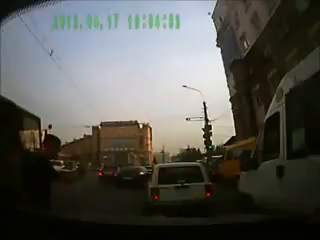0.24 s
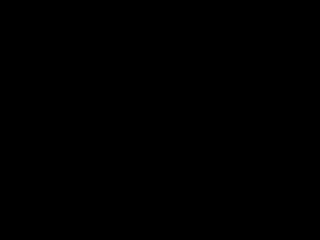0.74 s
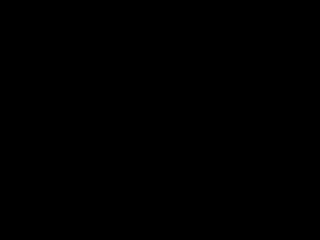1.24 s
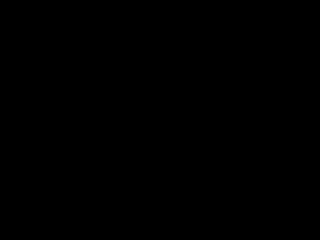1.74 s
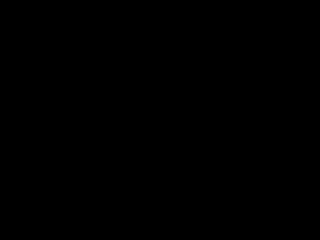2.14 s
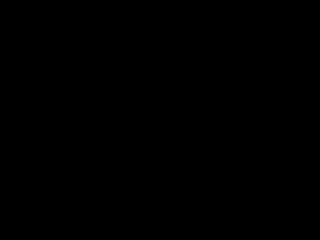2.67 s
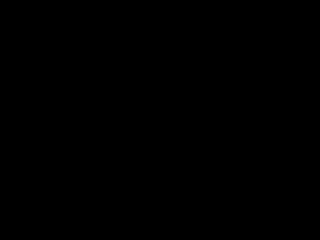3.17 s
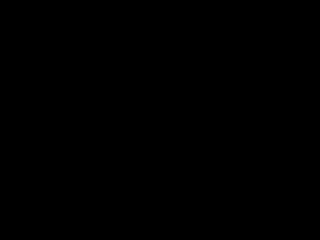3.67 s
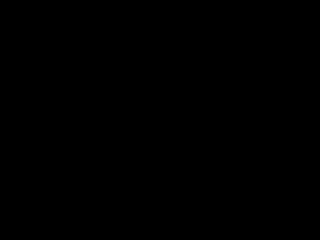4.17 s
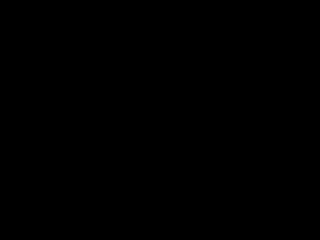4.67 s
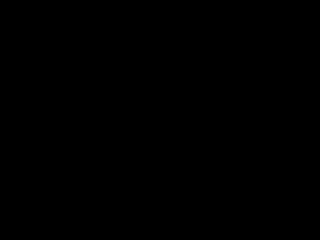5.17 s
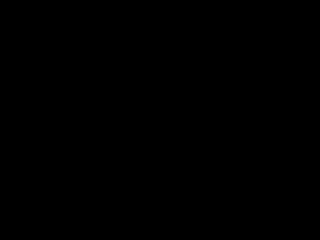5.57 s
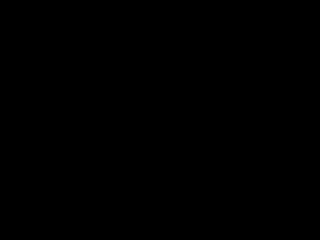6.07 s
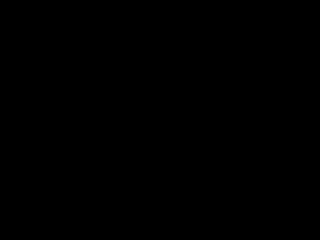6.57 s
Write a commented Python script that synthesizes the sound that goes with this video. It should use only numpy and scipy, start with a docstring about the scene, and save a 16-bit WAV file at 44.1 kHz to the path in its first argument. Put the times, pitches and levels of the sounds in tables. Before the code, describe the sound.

A low engine throb and passing traffic, heard from a car cabin, before a tyre skid ends in a collision and another bump.

```python
"""An idling engine throbs through a car's booming cabin, heard by a cheap dashboard microphone. First comes
a moment of quiet city street with the signal off centre, ending in a click. Then, over the idle, traffic
swells past, tyres outside stick and slip into a screech, and a blow and a second bump ring the car body.
Something groans and far brakes squeal faintly."""
import sys
import numpy as np
from scipy import signal
from scipy.fft import rfft, irfft, next_fast_len
from scipy.io import wavfile
from scipy.ndimage import uniform_filter1d

SR = 44100
rng = np.random.default_rng(int(sys.argv[2]) if len(sys.argv) > 2 else 0)


def unload_wav(signal):
    """Save mono or channel-first audio to the path in sys.argv[1] as 16-bit WAV at rate SR, clipped to [-1, 1]."""
    wavfile.write(
        sys.argv[1],
        SR,
        np.round(np.clip(np.atleast_2d(signal).T, -1, 1) * 32767).astype(np.int16),
    )


N = 300757
TIME = np.arange(N) / SR
CLICK_S = .59372  # the quiet street gives way to the idle

# blows on the car body: start_s, level_db, brightness_db, rise_s
BLOWS = [(4.347, -1, -19, .005), (4.363, 2.5, -13, 0.0029), (4.376, 1.5, -15, 0.0058),
         (4.801, -8, -23, 0.0091), (4.822, -3, -19, 0.0031)]
# hiss of rolling and sliding tyres: frequency_hz, density_db
TYRE_HISS = [(1180, -26), (2000, -3.5), (2450, -13), (2690, -8.5), (2900, -9), (3280, -8), (3770, -3),
             (4140, -14.5), (5080, -19.5), (5570, -15), (5830, -20.5), (6610, -20.5), (7400, -16),
             (8900, -26.5), (9700, -33), (12600, -66.5), (21300, -120)]


def idle_throb(firing_hz=27.27):
    """Slightly uneven firings shake the car as a near sine."""
    # swell of the throb: time_s, level_db
    swell = [(.62, -14), (2.4, -14), (3.7, -16.5), (4.4, -15.5), (4.6, -14), (6.8, -12.5)]
    _, level_db = curves(swell)
    turn = phase(firing_hz + 1.65 * wander(19))
    shake = np.sin(turn) + amp(-20.5) * np.sin(2 * turn + 0.44)
    return amp(level_db + 1.4 * wander(39)) * np.sqrt(2) * shake


def cabin_boom(pitch_hz=65.34, blow_send_db=-15.5, t60_s=0.99):
    """The cabin air booms unevenly above the idle; blows set it going too."""
    # swell of the boom: time_s, level_db
    swell = [(.62, -22.5), (1.13, -14.5), (2.31, -24.5), (2.6, -16.5), (2.89, -26), (2.96, -19.5),
             (4.23, -31.5), (5.16, -19), (5.7, -33), (5.89, -19), (6.8, -21.5)]
    _, level_db = curves(swell)
    struck_power = sum(
        np.clip((TIME - s) / .015, 0, 1) * amp(db + blow_send_db - 60 * abs(TIME - s) / t60_s) ** 2
        for s, db, *_ in BLOWS)
    boom = np.cos(phase(pitch_hz + 3.0 * wander(7.8))) * (1.77 + wander(16.6))
    return np.sqrt(amp(level_db) ** 2 + struck_power) * unit_rms(boom)


def skid(linger_s=0.33, street_t60_s=1.3):
    """Tread blocks stick and slip: each tyre is an unsteady oscillator with blurred, rasping overtones."""
    # course of the slide: time_s, slip_hz, squeal_db, scrub_db, roughness_factor
    slide = [(3.05, 1743, -23.5, -46.5, .8), (3.12, 1682, -19, -31.5, 0.64),
             (3.145, 1675, -28, -28.5, 1.42), (3.16, 1473, -13, -26.5, 1.58), (3.25, 1396, -17, -36, 1.7),
             (3.345, 1414, -22.5, -34.5, 1.7), (3.365, 1259, -10, -28, 1.28), (3.48, 1141, -13, -34, 1.52),
             (3.76, 1204, -13, -34.5, 0.88), (3.98, 1209, -16, -35, 0.71), (4.2, 1169, -17, -35.5, 0.98),
             (4.36, 1148, -11.5, -36, 1.05), (4.42, 1225, -22, -38.5, .9), (4.56, 1338, -24.5, -44.5, 0.27),
             (4.66, 1353, -21.5, -51.5, 0.38), (4.71, 1410, -36, -53, .25), (5.02, 1565, -42, -52.5, 0.37)]
    # sliding tyres at roughness 1: slip_ratio, relative_db, jitter_hz, extra_rasp_db
    tyres = [(1.0, 0.65, 25.7, 0), (.89, -3.5, 70, -9), (1.07, -3.5, 100, 8.5), (1.19, -12, 59.5, 11.5)]
    # overtones of the rasp: multiple, relative_db
    overtones = [(2, -1.5), (3, -8), (4, -6.5), (5, -5.5), (6, -17)]
    # colour the windows give the rasp: frequency_hz, gain_db
    glass = [(2000, -7), (2500, 5.5), (2900, 2.5), (3300, -0.5), (3800, 12), (4200, -1), (7400, -12.5),
             (9000, -18)]
    gate, slip_hz, squeal_db, scrub_db, roughness = curves(slide, fade_s=0.0074)
    squeal, rasp = 0, 0
    for ratio, tyre_db, jitter_hz, extra_db in tyres:
        turn = phase(ratio * slip_hz + roughness * jitter_hz * wander(121))
        # a rough slide wakes the quieter tyres
        grip = amp(tyre_db * (2 - np.minimum(roughness, 1.6)) + 3.2 * wander(45))
        squeal += grip * np.cos(turn)
        rasp += grip * amp(extra_db) * sum(amp(db) * np.cos(k * turn) for k, db in overtones)
    size = next_fast_len(N)
    glass_gain = amp(colour_at(glass, np.fft.rfftfreq(size, 1 / SR)))
    rasp = irfft(rfft(rasp, size) * glass_gain, size)[:N]
    scrub = gate * amp(scrub_db)
    screech = gate * amp(squeal_db) * unit_rms(squeal) + scrub * unit_rms(rasp)
    pole = np.exp(-1 / (linger_s * SR))
    held_power = signal.lfilter([1 - pole], [1, -pole], scrub ** 2)  # the street holds the hiss
    hiss = amp(-6.5) * np.sqrt(held_power + scrub ** 2) * noise(TYRE_HISS, 2.75, size=512)
    t = np.arange(SR // 4) / SR
    street = rng.standard_normal(len(t)) * amp(-60 * t / street_t60_s)  # echoes off house fronts
    # a thin squeal climbs as the skid dies
    screech += note(4.62, 4.88, 5.02, pitch_hz=2970, glide_hz_per_s=900, peak_db=-48,
                    ends_db=-52, waver_hz=38, flutter_db=4.2, rate_hz=45)
    echo = signal.fftconvolve(screech, street / np.linalg.norm(street))[:N]
    return screech + hiss + amp(-7) * echo


def body_blows():
    """Each blow is a short burst of rough contact that rings the car body."""
    # body modes: pitch_hz, relative_db, t60_s
    body_modes = [(57, -2.5, .35), (150.3, -3, 0.43), (204, -5.5, 0.58), (239, -10, 0.23),
                  (337.5, -6.5, 0.25), (418, -8.5, 0.33), (508, -1.5, 0.17), (1105, -3.5, 0.091)]
    t, track = np.arange(SR // 2) / SR, np.zeros(N + SR)
    ring = sum(amp(db - 60 * t / t60) * np.sin(2 * np.pi * hz * t) for hz, db, t60 in body_modes)
    for start_s, level_db, bright_db, rise_s in BLOWS:
        contact = rng.standard_normal(len(t)) * t / rise_s * np.exp(-t / rise_s)
        thud = signal.fftconvolve(np.exp(-t / 0.00013) + 0.72 * contact, ring)[:len(t)]
        crack = signal.lfilter(*signal.butter(2, [500, 3300], "band", fs=SR), contact)
        blow = thud / abs(thud).max() + amp(bright_db) * crack
        track[round(start_s * SR):][:len(t)] += amp(level_db) * blow
    return track[:N]


def traffic(falloff=1.51):
    """Tyre roar, rushing air and rumble swell as each vehicle nears and sink as it leaves."""
    # passing vehicles: closest_s, approach_s, roar_db, rush_db, rumble_db
    passes = [(.64, 0.055, -28.5, -21.5, -23), (0.831, 0.27, -18.5, -17, -23),
              (2.65, 0.23, -21, -28.5, -23.5), (3.05, .2, -15, -17.5, -19.5), (4.8, .12, -23.5, -34.5, -21),
              (5.3, 0.31, -19, -22, -22.5), (6.099, 0.16, -36, -36, -31), (6.75, 0.34, -34.5, -24, -27.5)]
    # colours of the three layers: frequency_hz, density_db
    roar_colour = [(180, -37.5), (300, -9.5), (350, -2.5), (397, -12), (476, -0.5), (583, -3), (779, -11),
                   (1020, -1.5), (1200, -5.5), (1590, -20), (1890, -27), (3000, -46.5), (3900, -79),
                   (6600, -120)]
    rush_colour = [(500, -9.5), (680, -4), (800, -2.5), (960, -2.5), (1100, -28), (1700, -30.5),
                   (2000, -51.5)]
    rumble_colour = [(21, -30.5), (38, -22), (52, -9.5), (80, -9.5), (100, -9.5), (123, -14), (194, -9),
                     (250, -9), (350, -16.5), (500, -11.5), (650, -48.5)]
    floors_db = (-27, -44, -26.5)  # roar, rush and rumble between passes
    closest_s, approach_s, *layers_db = np.transpose(passes)[:, :, None]
    nearness = (1 + ((TIME - closest_s) / approach_s) ** 2) ** -falloff
    roar, rush, rumble = (np.sqrt(amp(floor_db) ** 2 + (amp(db) ** 2 * nearness).sum(axis=0))
                          for db, floor_db in zip(layers_db, floors_db))
    wash = roar * noise(roar_colour, 1.93) + rumble * noise(rumble_colour, 1.0, size=4096)
    wash += rush * noise(rush_colour, 2.1)
    return wash + roar * amp(-32.5) * noise(TYRE_HISS, 2.2, size=512)


def exhausts():
    """Engines pull away: each exhaust note rises out of the traffic and sinks back."""
    # exhaust notes: start_s, peak_s, end_s, pitch_hz, glide_hz_per_s, peak_db
    pulls = [(0.51, 0.704, 1.193, 225.2, -19, -23.5), (0.698, 0.957, 0.96, 197, -9, -31),
             (1.601, 1.851, 2.25, 238.8, 59.5, -22), (2.25, 2.5, 2.92, 226.7, 75.5, -13),
             (3.879, 3.999, 4.18, 228.4, -94.5, -25), (4.653, 4.795, 6.35, 358.4, -2.5, -34),
             (5.2, 5.35, 5.75, 269.2, 27.5, -24.5), (5.45, 6.2, 7.06, 227.8, 32, -25)]
    return sum(note(*pull, ends_db=-34, waver_hz=1.22, flutter_db=2.2, rate_hz=8.2) for pull in pulls)


def groan():
    """A short, rough groan follows the second bump."""
    return note(4.93, 5.11, 5.25, pitch_hz=587, glide_hz_per_s=0, peak_db=-16.5,
                ends_db=-24, waver_hz=11.2, flutter_db=4.0, rate_hz=60)


def far_brakes():
    """Distant brakes squeal in two faint, wavering lines."""
    voice = dict(glide_hz_per_s=0, ends_db=-73, waver_hz=5.6, flutter_db=2.7, rate_hz=12)
    return (note(5.66, 5.8, 6.3, pitch_hz=4290, peak_db=-68, **voice)
            + note(5.98, 6.05, 6.17, pitch_hz=2880, peak_db=-59, **voice))


def trim_ticks(t60_s=0.0024):
    """Trim pieces tick, each a ping that dies at once."""
    # ticks: start_s, level_db, pitch_hz
    pings = [(0.825, -24, 3000), (.844, -29, 3000), (0.881, -23, 2500), (0.93, -32, 2610),
             (5.979, -30, 7460)]
    t, track = np.arange(SR // 2) / SR, np.zeros(N + SR)
    for start_s, db, hz in pings:
        track[round(start_s * SR):][:len(t)] += amp(db - 60 * t / t60_s) * np.sin(2 * np.pi * hz * t)
    return track[:N]


def whine():
    """Two close, steady tones make a thin whine."""
    # whine tones: pitch_hz, relative_db
    tones = [(7122, -77.5), (7181, -78)]
    return sum(amp(db + 5.5) * np.sin(phase(np.full(N, hz))) for hz, db in tones)


def quiet_street(swish_s=0.343, swish_length_s=.11, hiss_fade_db_per_s=7.5):
    """A low murmur of traffic with a faint hum, a fading hiss and one short swish."""
    # colours of the murmur, hiss and swish: frequency_hz, density_db
    murmur_colour = [(8.8, -28.5), (15, -8), (25, -32), (32, -25.5), (123, -42), (154, -41), (184, -44.5),
                     (297, -46), (389, -48.5), (1500, -54), (1950, -82), (3300, -120)]
    hiss_colour = [(350, -19), (600, -1), (1180, 6), (1400, -8), (1580, -0.5), (1880, -6.5), (2690, -7),
                   (2860, -9), (6920, -14.5), (9700, -26), (12600, -64), (21300, -120)]
    swish_colour = [(1200, -5), (1600, -5), (2700, -4), (4000, -10), (5400, -9.5), (6500, -15)]
    # hum tones: pitch_hz, relative_db
    tones = [(156.1, -38.5), (296.1, -43.5)]
    hum = sum(amp(db + 3 + 2.5 * wander(15)) * np.sin(2 * np.pi * hz * TIME) for hz, db in tones)
    gate = np.clip(np.minimum(TIME - swish_s, swish_s + swish_length_s - TIME) / 0.036 + .4, 0, 1)
    swish = gate * amp(-33.5) * noise(swish_colour, 1.6)
    hiss = amp(-33 - hiss_fade_db_per_s * TIME) * noise(hiss_colour, 0.74)
    murmur = amp(-26) * noise(murmur_colour, 0.75, size=4096)
    return murmur + hiss + hum + swish


def note(start_s, peak_s, end_s, pitch_hz, glide_hz_per_s, peak_db,
         ends_db, waver_hz, flutter_db, rate_hz):
    """One wavering tone that glides evenly, swells to its peak and sinks."""
    away = np.interp(TIME, [start_s, peak_s, end_s], [1, 0, 1]) ** 1.2  # a fairly pointed swell
    gate = np.clip(np.minimum(TIME - start_s, end_s - TIME) / 0.024 + 1, 0, 1)
    level = gate * amp(peak_db + (ends_db - peak_db) * away + flutter_db * wander(rate_hz))
    hz = pitch_hz + glide_hz_per_s * (np.clip(TIME, start_s, end_s) - peak_s)
    return level * np.sqrt(2) * np.sin(phase(hz + waver_hz * wander(rate_hz)))


def noise(colour, patchy_db, size=1024):
    """Coloured noise of rms 1 with drifting louder and softer patches."""
    hz = np.fft.rfftfreq(size, 1 / SR)
    real, imag, patches = rng.standard_normal((N * 4 // size + 5, len(hz), 3)).T
    patches = unit_rms(uniform_filter1d(uniform_filter1d(patches, size=10, axis=0), size=12, axis=1))
    outside = (hz < colour[0][0]) | (hz > colour[-1][0])
    colour_db = colour_at(colour, hz) - 90 * outside
    spectra = (real + 1j * imag) * amp(colour_db[:, None] + patchy_db * patches)
    return unit_rms(signal.istft(spectra, nperseg=size, noverlap=size * 3 // 4)[1][:N])


def colour_at(colour, hz):
    """A colour's level in dB, interpolated over log frequency."""
    points_hz, db = np.transpose(colour)
    return np.interp(np.log(hz + 1), np.log(points_hz + 1), db)


def curves(rows, fade_s=0.026):
    """A gate open while the table lasts, then its value columns at every sample."""
    times, *values = np.transpose(rows)
    gate = np.clip(np.minimum(TIME - times[0], times[-1] - TIME) / fade_s + 1, 0, 1)
    return (gate, *(np.interp(TIME, times, column) for column in values))


def wander(hz):
    """Random drift of rms 1, changing about hz times a second."""
    return unit_rms(signal.lfilter(*signal.butter(2, hz / SR * 2), rng.standard_normal(N)))


def phase(hz):
    return 2 * np.pi * (np.cumsum(hz) / SR + rng.random())


def amp(db):
    return 10 ** (np.asarray(db) / 20)


def unit_rms(x):
    return x / np.sqrt(np.mean(x ** 2) + 1e-20)


def scene():
    """The quiet street cuts to the idling car and all around it, alike in both channels."""
    mix = idle_throb() + cabin_boom() + whine()
    mix += traffic() + exhausts() + far_brakes()
    mix += groan() + skid() + body_blows() + trim_ticks()
    mix *= np.clip((TIME - CLICK_S) / 0.0044, 0, 1)
    return np.tile(np.where(TIME < CLICK_S, quiet_street(), mix), (2, 1))


def record(dry, ceiling=.95, dc_offset=-.58, cutoff_hz=9750):
    """The cheap microphone flattens peaks, snaps back to centre with a click and loses the top treble."""
    squeezed = dry / (1 + abs(dry / ceiling) ** 6) ** (1 / 6)
    shifted = squeezed + dc_offset * (TIME < CLICK_S)
    padded = np.pad(shifted, ((0, 0), (255, 255)), "edge")
    lowpass = signal.firwin(511, cutoff_hz, window=("kaiser", 9), fs=SR)
    return signal.oaconvolve(padded, lowpass[None], "valid")


dry = scene()
out = record(dry)
unload_wav(out)
```